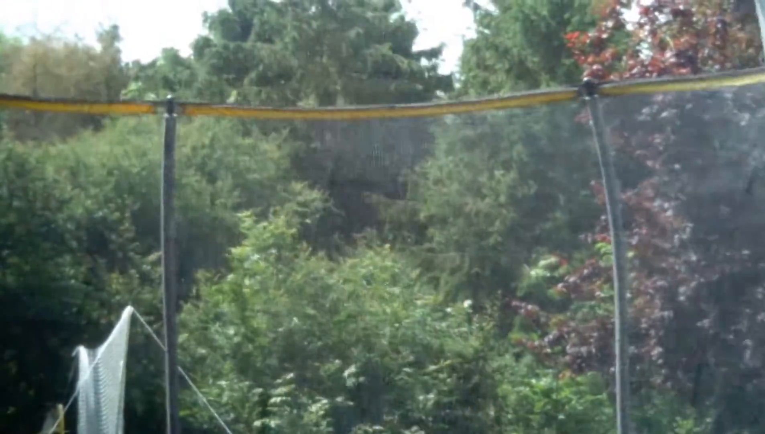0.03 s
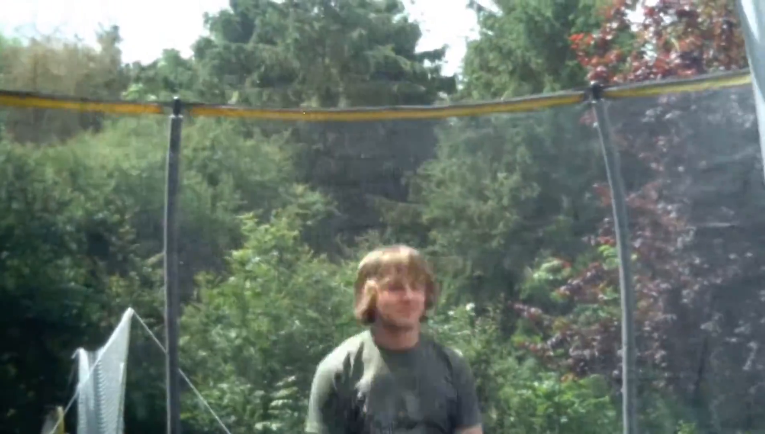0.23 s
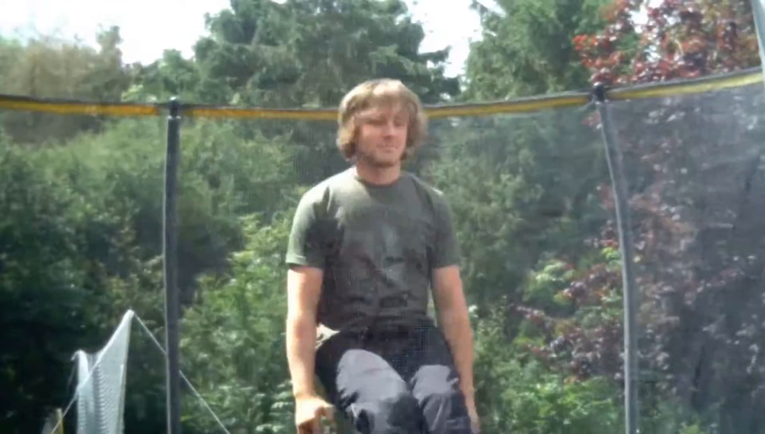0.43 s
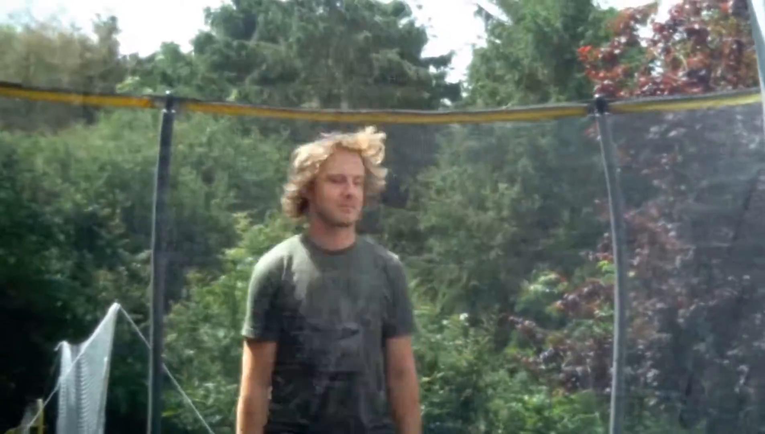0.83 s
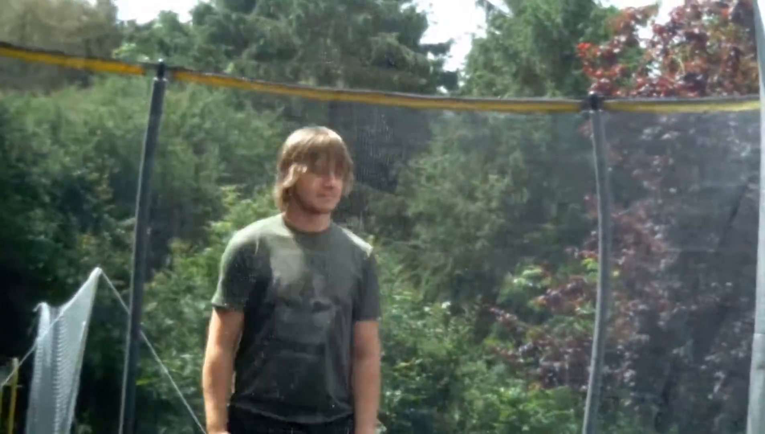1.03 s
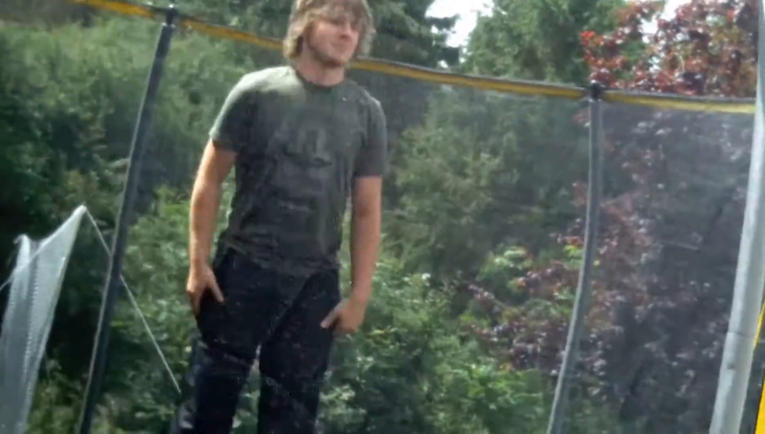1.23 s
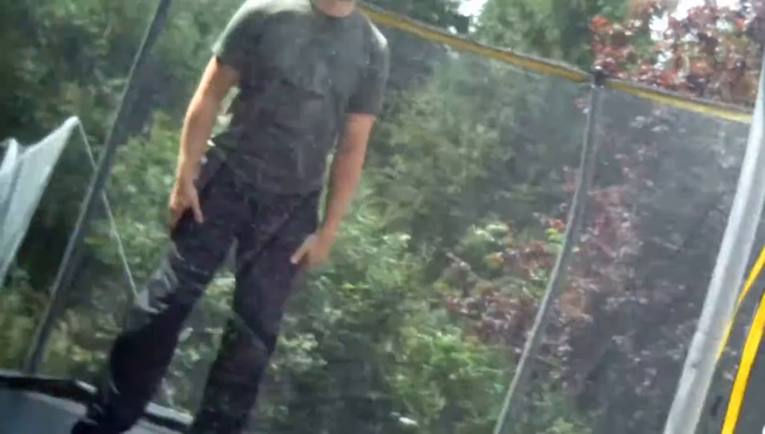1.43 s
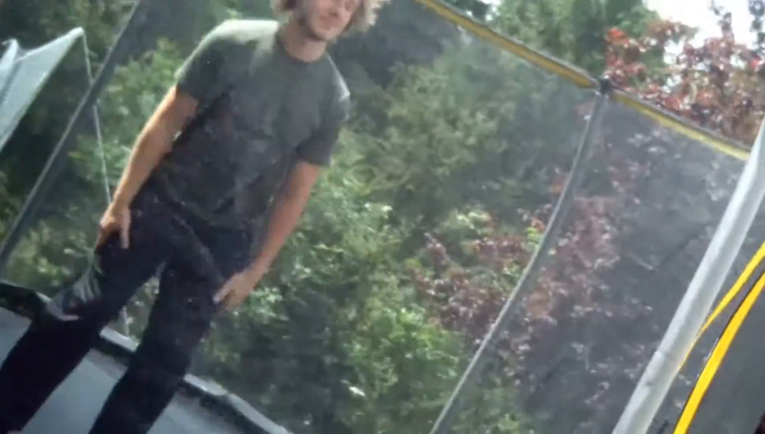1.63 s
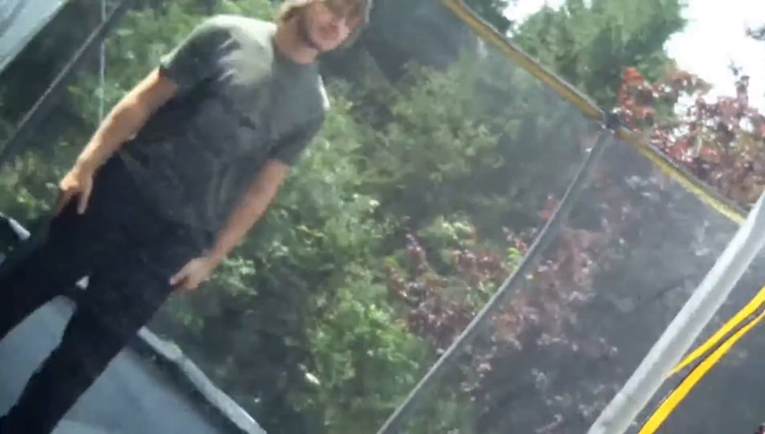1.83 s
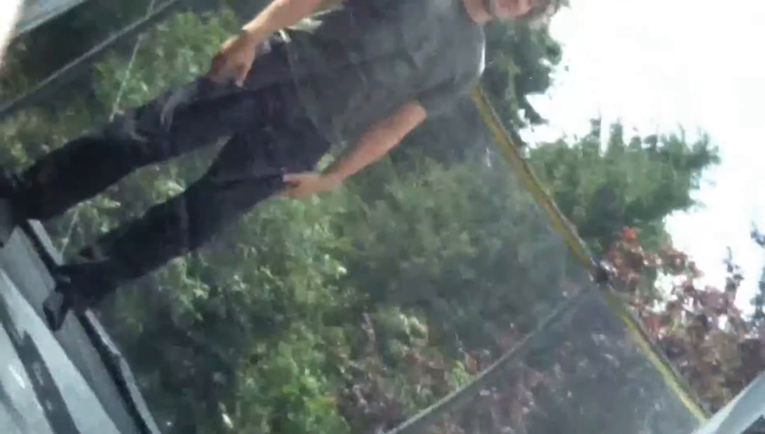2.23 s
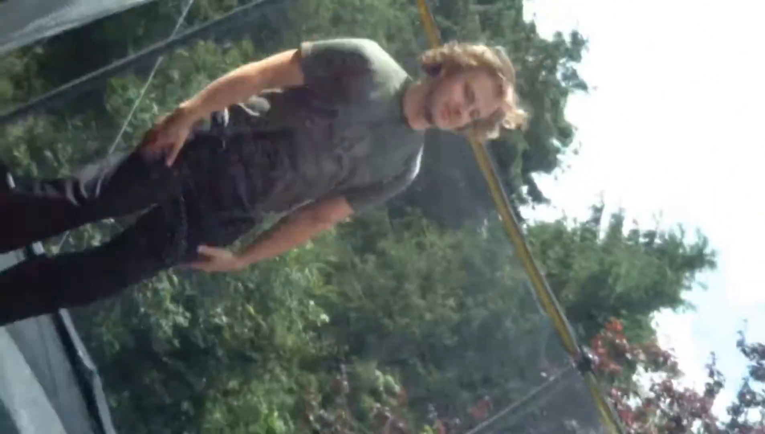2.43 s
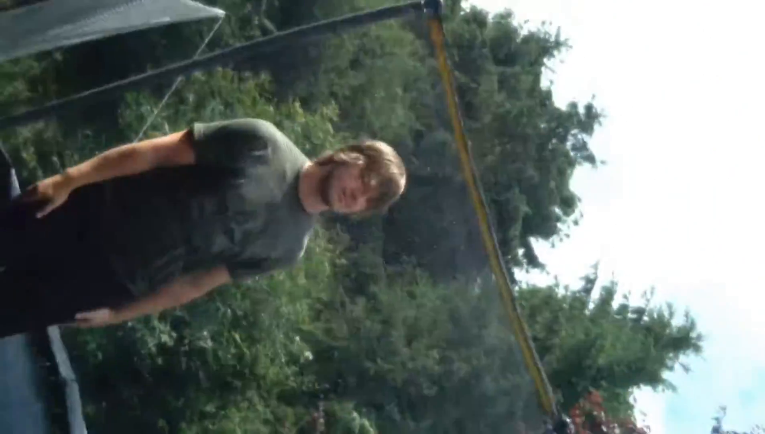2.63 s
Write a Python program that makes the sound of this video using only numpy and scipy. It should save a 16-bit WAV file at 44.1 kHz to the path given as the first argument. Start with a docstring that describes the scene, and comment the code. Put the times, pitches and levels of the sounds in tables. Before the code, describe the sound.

A trampoline crunches and creaks under one landing, then rustles and squeaks under lighter steps.

```python
"""In a garden, a person lands on a trampoline, and the mat then sways under smaller steps.
The mat snaps taut with a crunch and rustles as it stretches; hooks scrape and click on the frame,
and the springs stick and slip in bright creaks, all of it ringing through the steel.
Frame tubes groan, soft knocks bump the camera and two thin chirps sound over a bed of quiet air.
Trees scatter a faint echo, and the small microphone rolls off steeply above 7 kHz."""
import sys
import numpy as np
from scipy import signal
from scipy.fft import rfft, irfft, next_fast_len
from scipy.io import wavfile
from scipy.ndimage import map_coordinates

SR = 44100
rng = np.random.default_rng(int(sys.argv[2]) if len(sys.argv) > 2 else 0)


def transcribe(signal):
    """Save signal, clipped to [-1, 1], as a 16-bit WAV file at the path in sys.argv[1]."""
    frames = np.atleast_2d(signal).T
    limited = np.clip(frames, -1, 1)
    pcm = np.round(limited * 32767).astype(np.int16)
    wavfile.write(sys.argv[1], SR, pcm)


N = 119070
SPAN_DB = 20  # every rise and fall time covers this much level

# tone curves of the air, the sources and the microphone (frequency [Hz], gain [dB])
AIR_EQ = [(25, -14.5), (70, 3.5), (150, 12), (300, 8.5), (600, 8.5), (1500, -1.5), (4000, -2), (6500, -5.5),
          (8000, -4.5)]
CLICK_EQ = [(100, -12), (1000, -17.5), (3500, -13), (5000, 2), (6200, -1.5), (7700, 4.5), (10000, -6.5)]
RUSTLE_EQ = [(30, -43), (120, -14), (300, -3.5), (700, -1), (1400, 1), (2600, 0), (3300, -1), (4000, -2),
             (6000, -1), (7000, -6)]
SCRAPE_EQ = [(100, -43), (2800, -30.5), (3700, -6.5), (4600, -1.5), (5400, 0.5), (6200, 2.5), (7000, -13)]
CRUNCH_EQ = [(30, -31.5), (120, -19.5), (240, -4.5), (1400, -0.5), (1800, 5), (2150, -4.5), (4600, -5),
             (5400, 1.5), (6200, 5), (7000, -4.5)]
MIC_EQ = [(20, 3), (6400, 0), (7000, -5), (7500, -16), (8100, -27), (10000, -43.5), (15000, -64.5)]
# ringing modes of the steel springs and frame (frequency [Hz], width [Hz], gain [dB])
STEEL_MODES = [(672, 37, -14), (824, 270, -8.5), (1285, 110, -13.5), (1729, 17, 1.5), (1895, 19, -7.5),
               (3150, 60, -8), (3455, 20, -1.5), (3800, 11, -5.5), (4500, 24, 0.5), (5060, 40, 2.5),
               (5460, 33, 1.5), (5750, 99, -7.5), (6095, 20, -2), (6010, 12, -3), (7470, 65, 3)]

# faint, thin chirps (peak time [s], level [dB])
CHIRP_CUES = [(.762, -48), (1.06, -48)]
# hollow groans of the frame tubes (peak time [s], level [dB], pitch [Hz])
TUBE_GROANS = [(1.28, -64, 3250), (1.48, -63, 3390), (1.679, -61, 3190), (2.104, -63.5, 1310),
               (2.099, -61, 3250), (2.265, -67.5, 1279), (2.365, -62.5, 3310), (2.45, -57.5, 3260)]
# soft knocks on the camera (time [s], level [dB], pitch [Hz])
CAMERA_KNOCKS = [(.131, -50, 202), (.157, -56, 190), (0.177, -54.5, 190), (.258, -33.5, 295),
                 (.343, -29, 245), (.356, -31.5, 376), (.742, -45.5, 309), (.752, -54, 320),
                 (.962, -56, 300), (0.989, -46, 282), (1.687, -45.5, 254), (1.703, -50, 308),
                 (1.858, -44, 275), (1.872, -52.5, 306), (1.896, -47, 332), (1.921, -56.5, 220)]
# sharp clicks of a hook or cord (time [s], level [dB])
HOOK_CLICKS = [(0.741, -47), (0.752, -51), (1.6863, -28.5), (1.858, -54), (2.344, -42.5), (2.433, -37),
               (2.616, -54.5)]
# springs creaking (peak time [s], level [dB], pitch [Hz], rise [s], fall [s])
SPRING_CREAKS = [(.2, -66, 1965, 0.03, .06), (0.226, -53, 1834, 0.0049, 0.021),
                 (0.241, -53.5, 1820, 0.0065, 0.031), (0.232, -38.5, 6210, 0.0096, 0.051),
                 (0.289, -33.5, 6670, 0.002, 0.025), (0.473, -39.5, 6150, .006, .025),
                 (0.483, -31, 6100, 0.034, 0.052), (0.496, -24, 6164, 0.0074, .02),
                 (.563, -51, 6150, 0.032, 0.032), (0.629, -45.5, 6030, 0.022, 0.03),
                 (.69, -58, 5820, 0.034, 0.047), (.968, -69.5, 6100, 0.014, 0.043),
                 (1.036, -63, 6150, 0.027, 0.0293), (1.119, -48.5, 6180, 0.0055, 0.032),
                 (1.144, -59, 6060, 0.0093, 0.026), (1.168, -57.5, 6150, 0.016, 0.051),
                 (1.256, -57, 5840, .015, .04), (1.465, -59, 5886, 0.057, 0.042),
                 (1.603, -51, 5740, 0.014, 0.025), (1.632, -55, 6060, 0.023, 0.028),
                 (1.687, -41.5, 5920, 0.0016, 0.033), (1.751, -46.5, 6200, 0.0092, 0.043),
                 (1.99, -68, 5670, 0.11, 0.13), (2.075, -48.5, 5850, 0.018, 0.013),
                 (2.101, -54.5, 5656, 0.0066, 0.037), (2.17, -66.5, 5770, 0.059, .15),
                 (2.26, -52, 5712, 0.041, 0.063), (2.346, -39.5, 5650, 0.0035, 0.014),
                 (2.355, -47, 5740, 0.0058, 0.032), (2.433, -37.5, 5450, 0.003, 0.012),
                 (2.441, -41.5, 5430, 0.0029, 0.029)]
# swells of the mat, net and hooks (peak time [s], level [dB], rise [s], fall [s])
NET_STIR = [(1.9, -69.5, 1.7, 16)]  # the net keeps stirring between steps
MAT_DRUMMING = [(.45, -67, .15, 0.27), (1.93, -71, .06, 0.11)]  # the mat drums on after a footfall
FABRIC_RUSTLES = [(.228, -52.5, 0.038, 0.3), (.3, -46.5, 0.063, 0.077), (.402, -40, 0.12, 0.15),
                  (.54, -48.5, 0.15, 0.16), (.665, -57.5, .05, 0.28), (1.16, -64, 0.29, .2),
                  (1.258, -54.5, 0.085, 0.11), (1.47, -61, 0.19, 0.18), (1.55, -60.5, 0.126, 0.18),
                  (1.63, -56, 0.11, 0.12), (1.76, -61, 0.6, 0.23), (1.87, -67.5, .1, 0.29),
                  (2.07, -62.5, 0.028, 0.14), (2.11, -59, 0.037, 0.1), (2.27, -61.5, 0.095, 0.15),
                  (2.353, -55, 0.039, 0.13), (2.438, -54, 0.01, 0.15)]  # mat and net stretch and relax
HOOK_SCRAPES = [(.2, -60, 0.036, .1), (.243, -36, 0.013, 0.053), (.405, -40.5, 0.14, 0.11),
                (.498, -35.5, 0.082, 0.1), (.66, -57.5, .02, 0.055), (1.124, -59, 0.013, 0.14),
                (1.218, -57, 0.0065, 0.094), (1.255, -56.5, 0.045, 0.11), (1.463, -50, 0.06, 0.061),
                (1.555, -57, .06, 0.09), (1.603, -49, .03, 0.064), (1.635, -47, 0.054, 0.069),
                (1.689, -52, .004, 0.11), (1.76, -52.5, 0.051, 0.056), (2.10, -55.5, 0.073, 0.111),
                (2.262, -57, 0.056, 0.12), (2.35, -49, 0.032, 0.0954), (2.436, -44.5, 0.0038, 0.079)]  # hooks slide on the frame
LANDING_HIT = [(.341, -24, 0.032, 0.058)]  # the person hits the mat


def amp(db):
    """Decibels to gain."""
    return 10 ** (np.asarray(db) / 20)


def unit(x):
    """Scale to rms 1."""
    return x / np.sqrt(np.mean(x ** 2) + 1e-20)


def colour(x, points):
    """Causal EQ through (frequency [Hz], gain [dB]) points."""
    size = next_fast_len(N + 8192, True)
    hz, db = np.transpose(points)
    curve_db = np.interp(np.log(np.fft.rfftfreq(size, 1 / SR) + 1), np.log(hz), db)
    cepstrum = irfft(np.log(amp(curve_db)), size)
    cepstrum[1:size // 2] *= 2  # fold to minimum phase: no ringing ahead of a hit
    cepstrum[size // 2 + 1:] = 0
    return irfft(rfft(x, size) * np.exp(rfft(cepstrum)), size)[:N]


def resonate(x, hz, width_hz):
    """One resonance, gain 1 at its centre."""
    return signal.lfilter(*signal.iirpeak(hz, hz / width_hz, SR), x)


def band(x, hz, width_hz):
    """A steep-sided resonance, rms 1."""
    return unit(resonate(resonate(x, hz, width_hz), hz, width_hz))


def wobble(per_s):
    """A smooth random modulation curve."""
    return map_coordinates(rng.standard_normal(int(N * per_s / SR) + 4), [np.arange(N) * per_s / SR])


def swell(peak_s, rise_s, fall_s):
    """An envelope that grows to 1 at its peak and dies away."""
    t = np.arange(N) / SR - peak_s
    return amp(-SPAN_DB * np.minimum(np.maximum(-t / rise_s, t / fall_s), 10))


def envelope(rows):
    """A table of swells, summed in power."""
    return np.sqrt(sum((amp(db) * swell(s, rise, fall)) ** 2 for s, db, rise, fall in rows))


def grains(per_s, spread_db):
    """Random tiny impulses of uneven size, rms 1."""
    size = amp(spread_db * np.clip(rng.standard_normal(N), -2, 2))
    return unit((rng.random(N) < per_s / SR) * size * rng.choice([-1, 1], N))


def friction(eq, per_s, spread_db, hiss):
    """Grains over a smooth hiss, coloured by what is rubbed."""
    return unit(colour(grains(per_s, spread_db) + hiss * rng.standard_normal(N), eq))


def air(level_db=-71):
    """A quiet bed of outdoor air, fullest in the low mids."""
    return amp(level_db) * unit(colour(rng.standard_normal(N), AIR_EQ))


def tree_echo(x, t60_s=0.61, build_s=0.023):
    """The trees around the garden scatter a dark, diffuse tail."""
    t = np.arange(SR) / SR
    tail = rng.standard_normal(SR) * amp(-60 * t / t60_s) * (1 - np.exp(-t / build_s))
    wet = signal.fftconvolve(x, tail / np.linalg.norm(tail))[:N]
    return colour(wet, [(100, 5), (1500, -1), (4000, -9.0), (6000, -10.5)])


def chirps(hz=8220, rise_s=0.011, fall_s=0.024):
    """Two thin, very high notes, perhaps from a small bird."""
    note = np.sin(2 * np.pi * hz * np.arange(N) / SR)
    return note * envelope([(s, db, rise_s, fall_s) for s, db in CHIRP_CUES])


def groans(rise_s=0.07, fall_s=0.091, width_hz=320):
    """The frame tubes rub in their joints, each around one hollow resonance."""
    return sum(amp(db) * swell(s, rise_s, fall_s) * band(rng.standard_normal(N), hz, width_hz)
               for s, db, hz in TUBE_GROANS)


MAT_HZ = 143.5  # the mat's drum note


def knocks(bump_t60_s=0.013, snap_t60_s=0.0047, shudder_t60_s=0.084, drum_t60_s=0.39):
    """Dull bumps on the camera, each with a snap, a loose shudder and a faint drumming of the mat."""
    out, t = np.zeros(N + SR), np.arange(SR // 3) / SR
    for s, db, hz in CAMERA_KNOCKS:
        bump = np.sin(2 * np.pi * hz * t) * amp(-60 * t / bump_t60_s)
        hardness = 0.49 * amp(0.2 * (db + 42.5))  # harder knocks snap more brightly
        snap = hardness * np.sin(2 * np.pi * 750 * t) * amp(-60 * t / snap_t60_s)
        rattle = unit(resonate(rng.standard_normal(len(t)), hz, width_hz=260))
        shudder = rattle * amp(-19.5 - 60 * t / shudder_t60_s)
        drum_hz = MAT_HZ * (1 + 0.11 * rng.standard_normal())
        drum = np.sin(2 * np.pi * drum_hz * t) * amp(-23 - 60 * t / drum_t60_s)
        out[round(s * SR):][:len(t)] += amp(db) * (bump + snap + shudder + drum)
    return colour(out[:N], [(20, -25.5), (70, -20.0), (200, 1.0), (800, 4.0), (1300, -1), (3000, -14.5)])


def steel_ring(x):
    """Whatever rubs on the trampoline sets its springs and frame ringing."""
    return 0.95 * x + sum(amp(db) * resonate(x, hz, width) for hz, width, db in STEEL_MODES)


def clicks(rise_s=0.0003, fall_s=0.004):
    """A hook or cord ticks in short, bright bursts of noise."""
    bursts = envelope([(s, db, rise_s, fall_s) for s, db in HOOK_CLICKS])
    return bursts * unit(colour(rng.standard_normal(N), CLICK_EQ))


def fabric():
    """Woven mat and net rustle as they stretch and relax; the mat drums underneath."""
    weave = friction(RUSTLE_EQ, per_s=1600, spread_db=2.5, hiss=0.59)
    drum = band(rng.standard_normal(N), MAT_HZ, width_hz=91)
    return envelope(FABRIC_RUSTLES + NET_STIR) * weave + envelope(MAT_DRUMMING) * drum


def scrapes():
    """Hooks slide on the frame with a gritty hiss."""
    return envelope(HOOK_SCRAPES) * friction(SCRAPE_EQ, per_s=1000, spread_db=2.5, hiss=1.0)


def creaks(detune_hz=85, waver_hz=105.1, grit_share=0.31):
    """Each spring jangles on three close, wavering notes, roughened by its sticking and slipping."""
    out = np.zeros(N)
    waver = waver_hz * wobble(per_s=400)
    slips = grains(per_s=900, spread_db=1) + 0.5 * rng.standard_normal(N)
    for s, db, hz, rise, fall in SPRING_CREAKS:
        notes_hz = [hz + k * detune_hz + np.roll(waver, rng.integers(N)) for k in (-1, 0, 1)]
        jangle = unit(np.sin(2 * np.pi * np.cumsum(notes_hz, axis=1) / SR).sum(axis=0))
        grit = band(np.roll(slips, rng.integers(N)), hz, width_hz=920)
        creak = np.sqrt(1 - grit_share) * jangle + np.sqrt(grit_share) * grit
        out += amp(db) * swell(s, rise, fall) * creak
    return out


def landing():
    """The main hit: the mat snaps taut with a dense crunch."""
    return envelope(LANDING_HIT) * friction(CRUNCH_EQ, per_s=2200, spread_db=3, hiss=0.26)


def scene(echo_send_db=-16):
    """The mono mix: trampoline, knocks and chirps, with their echo and the air behind them."""
    trampoline = steel_ring(landing() + fabric() + scrapes() + creaks() + clicks()) + groans()
    direct = trampoline + knocks() + chirps()
    return (air() + amp(echo_send_db) * tree_echo(direct) + direct)[None]


def record(dry, hiss_db=-88.5, cutoff_hz=15070):
    """The small microphone rolls off above 7 kHz and adds a faint hiss, under a brick-wall high cut."""
    miked = colour(dry[0], MIC_EQ) + amp(hiss_db) * rng.standard_normal(N)
    passband = np.fft.rfftfreq(N, 1 / SR) < cutoff_hz
    return irfft(rfft(miked) * passband, N)[None]


dry = scene()
out = record(dry)
transcribe(out)
```